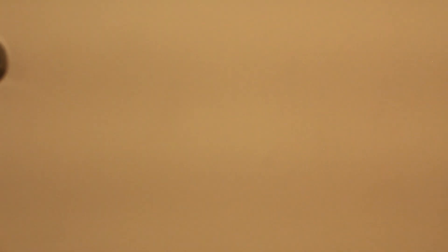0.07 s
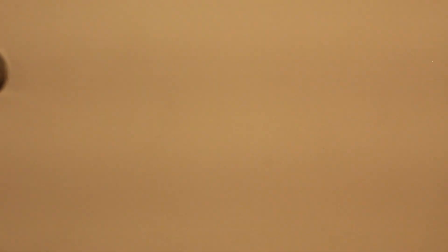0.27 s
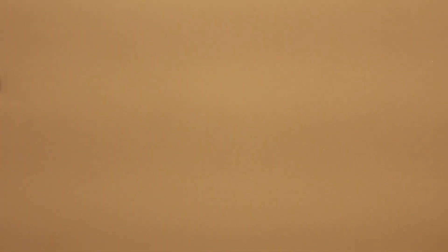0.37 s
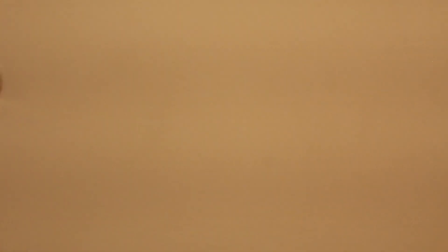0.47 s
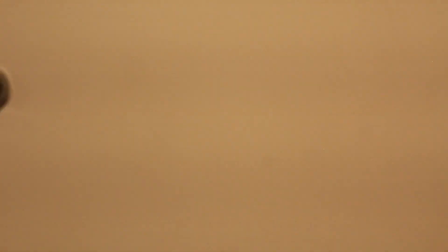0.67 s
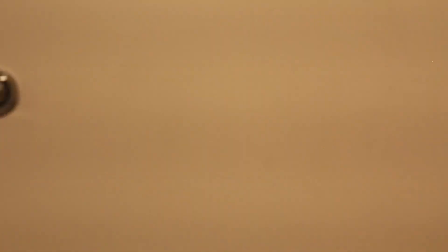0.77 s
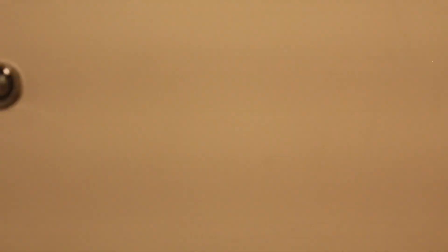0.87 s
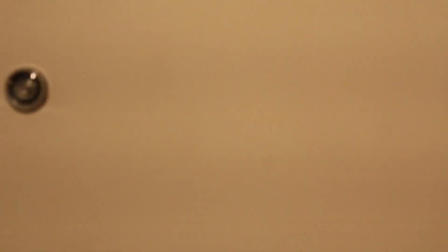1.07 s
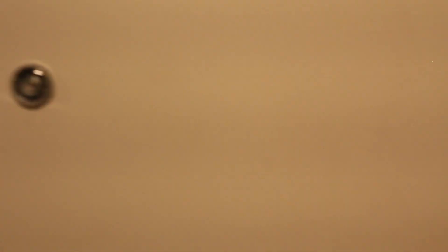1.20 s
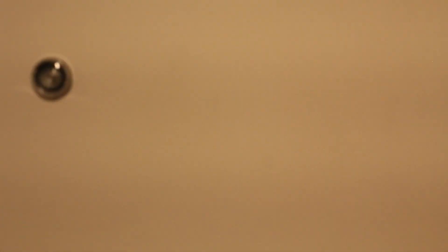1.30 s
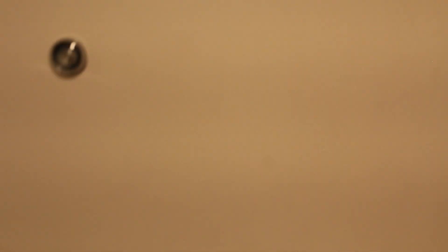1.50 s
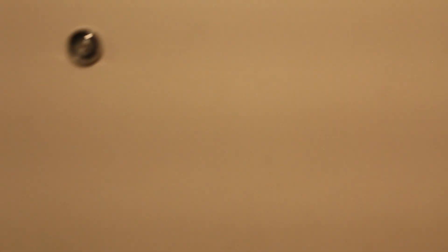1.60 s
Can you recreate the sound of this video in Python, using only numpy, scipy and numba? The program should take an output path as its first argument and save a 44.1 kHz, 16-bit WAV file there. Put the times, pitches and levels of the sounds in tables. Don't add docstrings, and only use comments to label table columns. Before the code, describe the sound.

Close microphone on a wooden door: six rapid, hollow hand knocks with a slight frame rattle, short indoor echo, tiny bright metallic tinkles of keys around them, then quiet room noise.

```python
import sys
import numpy as np
from scipy import signal
from scipy.fft import rfft, irfft
from scipy.io import wavfile
from numba import njit

SR = 44100
rng = np.random.default_rng(int(sys.argv[2]) if len(sys.argv) > 2 else 0)


def invert_db(level):
    return 10 ** (np.asarray(level, dtype=float) / 20)


def transcribe(signal):
    frames = np.atleast_2d(signal).T
    limited = np.clip(frames, -1, 1)
    pcm = np.round(limited * 32767).astype(np.int16)
    wavfile.write(sys.argv[1], SR, pcm)


N = 72765

# start [s], level [dB], contact time [ms], extra level of the low panel
# modes [dB], level of the frame slap over the blow [dB].
KNOCKS = [
    (0.2301, -7, 0.81, -1.5, 6),
    (0.4587, -6.5, 0.58, 1, 3),
    (0.6818, -5, 0.59, 0.5, 2.4),
    (0.9019, -6, 0.58, -0.5, 3.63),
    (1.1199, -5, 0.68, -13, 3.5),
    (1.3343, -2.5, 0.68, -17.5, 2.5),
]


def strikes(times, gains):
    x = np.zeros(N + 1)
    at = np.asarray(times) * SR
    i = at.astype(int)
    np.add.at(x, i, gains * (1 - at + i))
    np.add.at(x, i + 1, gains * (at - i))
    return x[:N]


def decay(t60):
    return np.exp(-np.log(1000) / (t60 * SR))


def ring(x, hz, t60):
    pole = decay(t60) * np.exp(2j * np.pi * hz / SR)
    return signal.lfilter([1], [1, -pole], x).imag


def body(times, db, modes, scatter_db):
    chance = rng.standard_normal((len(times), len(modes)))
    out = np.zeros(N)
    for k, (hz, mode_db, t60) in enumerate(modes):
        gains = invert_db(db + mode_db + scatter_db * chance[:, k])
        out += ring(strikes(times, gains), hz, t60)
    return out


def burst(times, db, hz, width_hz, t60):
    fade = signal.lfilter([1], [1, -decay(t60)], strikes(times, invert_db(db)))
    edges = np.clip([hz - width_hz / 2, hz + width_hz / 2], 100, SR * 0.45)
    band = signal.butter(2, edges, "band", fs=SR, output="sos")
    return signal.sosfilt(band, fade * rng.standard_normal(N))


def air():
    # frequency [Hz], level per Hz [dB].
    floor_curve = [(20, -13), (60, -8.5), (150, 0), (400, -8.5), (1500, -17.5), (5000, -30.5),
                   (13500, -29.5), (16000, -60.5)]
    level_db, duck_db, duck_hold_s = -49.5, -1.5, 1.5

    curve_hz, curve_db = np.array(floor_curve).T
    f = np.maximum(np.arange(N // 2 + 1) * SR / N, 1)
    tint = invert_db(np.interp(np.log(f), np.log(curve_hz), curve_db))
    hiss = irfft(rfft(rng.standard_normal(N)) * tint, N)

    blows = strikes(np.array(KNOCKS)[:, 0], 0.41)
    load = np.tanh(signal.lfilter([1], [1, -np.exp(-1 / (duck_hold_s * SR))], blows))
    return hiss * invert_db(level_db + duck_db * load) / hiss.std()


def keys():
    # start [s], first ring [dB], second ring [dB].
    hits_a = [(0.388, -31, -54), (0.3934, -48, -64), (0.4075, -41, -70), (0.6274, -59, -54),
              (0.6374, -38, -51), (0.7881, -71, -50), (0.832, -38, -49), (0.8415, -47, -37),
              (0.8564, -45, -43), (0.8629, -40, -53), (0.9173, -46, -59.5), (0.9996, -54, -48),
              (1.0444, -66, -66), (1.0635, -71, -50), (1.291, -47, -37), (1.291, -39, -44),
              (1.3464, -39, -68), (1.3608, -35, -57)]
    hits_b = [(0.0992, -45, -65), (0.2884, -59, -51), (0.4644, -63, -55), (0.5354, -76, -48),
              (0.5652, -50, -41.5), (0.9323, -40, -59), (0.9837, -67, -54), (1.0121, -51, -39),
              (1.1263, -69.5, -63), (1.2675, -67, -58), (1.4331, -67, -60), (1.4574, -74, -64),
              (1.475, -44, -60), (1.5738, -53, -90), (1.6342, -72, -69)]
    hits_c = [(0.2882, -49, -68), (0.3177, -57, -78), (0.3544, -59, -67), (0.4664, -54, -53),
              (0.4828, -62, -67), (0.7701, -64, -71), (0.9353, -63, -54), (1.012, -59, -55),
              (1.1803, -70, -86), (1.3917, -52, -77), (1.417, -74, -84)]
    ring_hz = [(12420, 13620, 8600), (6210, 7440, 11400), (8320, 13830, 11100)]
    # t60 of the three rings [s, s, s], third ring against the louder of the others [dB].
    ring_decay = [(.071, .071, .071, -9), (0.09, 0.077, 0.14, -7.5), (.21, .151, .061, -11)]
    # start [s], level [dB].
    click_hits = [(0.386, -31.5), (0.4509, -61.5), (0.4654, -60), (0.546, -44), (0.5544, -63),
                  (0.5721, -27.5), (0.7128, -45.5), (0.794, -46), (0.92, -31), (0.9314, -40), (1.0137, -42),
                  (1.0725, -60), (1.121, -36.5), (1.2326, -48), (1.2675, -56), (1.2873, -36), (1.3514, -59),
                  (1.3643, -48), (1.474, -66)]
    touch_ms, second_lift_db = 0.66, 5
    keys_db, clicks_db = -9, -6.4

    touch = signal.windows.hann(int(touch_ms * SR / 1000) + 3)
    jingle = np.zeros(N)
    for hits, pitches, (*t60s, third_db) in zip((hits_a, hits_b, hits_c), ring_hz, ring_decay):
        s, first, second = np.array(hits).T
        second = second + second_lift_db
        third = np.maximum(first, second) + third_db
        for hz, t60, db in zip(pitches, t60s, (first, second, third)):
            soft = touch * np.cos(2 * np.pi * hz / SR * np.arange(len(touch))) * 2 / touch.sum()
            jingle += ring(np.convolve(strikes(s, invert_db(db)), soft)[:N], hz, t60)

    s, db = np.array(click_hits).T
    clicks = burst(s, db, hz=10720, width_hz=7700, t60=0.022)
    return invert_db(keys_db) * jingle + invert_db(clicks_db) * clicks


def wood_grain():
    low_hz, top_hz, level_db, t60_s = 260.5, 3293, -21, 0.18
    pick = rng.random((50, 2))
    hz = low_hz * (top_hz / low_hz) ** pick[:, 0]
    t60 = t60_s * (0.5 + pick[:, 1]) * (700 / hz) ** 0.4
    return np.c_[hz, level_db + 0 * hz, t60]


def door():
    # frequency [Hz], level [dB], t60 [s].
    panel_low = [(385.6, -5.5, 0.086), (455.7, -22.5, 0.4), (505, -13.5, 0.32), (578, -6.5, 0.14)]
    panel = [(689, -6.5, 0.11), (798, -16.5, 0.23), (855, -1.5, 0.12), (1001.2, 3.5, 0.064),
             (1053, -13.5, 0.15), (1216.7, -0.5, 0.064), (1314.5, 8.5, .05), (1416, -7, 0.045),
             (1551, -6, 0.046), (1734, -4.5, 0.023), (1962, -1.5, 0.025), (2040, -40, 0.035)]
    leaf = [(70, -28, 0.58), (110.5, -18.5, 1.05), (139.8, -28, 0.6), (164, -44, 0.035), (181, -14.5, 0.47),
            (211.7, 0, 0.087), (278, -10, 0.034)]
    scatter_db, low_edge_hz, low_cut_hz = 1.5, 620, 79.5
    slap_ms, tick_ms, echo_ms = 2.7114, 0.39, 44.5
    tick_db, echo_db = -44, -38.5

    out = np.zeros(N)
    grain = wood_grain()
    is_low = grain[:, 0] < low_edge_hz
    plus = np.arange(len(grain)) % 2 == 1
    for s, db, contact_ms, low_db, slap_db in KNOCKS:
        when = np.array([s, s + slap_ms / 1000])
        size = np.array([db, db + slap_db])
        rung = body(when, size, panel, scatter_db)
        rung += body(when, size + low_db, panel_low, scatter_db)
        rung += body(when, size, leaf, scatter_db)
        here = grain + np.outer(is_low, [0, low_db, 0])
        rung += body(when, size, here[plus], 3.53)
        rung -= body(when, size, here[~plus], 4.3)

        u = np.arange(128) / SR * 1000 / contact_ms
        push = np.where(u < 1, np.sin(np.pi * u) ** 2, 0)
        out -= invert_db(-8) * np.convolve(rung, push / push.sum())[:N]

        slap = when[1:]
        out += burst(slap + tick_ms / 1000, size[1:] + tick_db, hz=3600, width_hz=5000, t60=0.039)
        answer = slap + echo_ms / 1000 + np.array([-0.002, 0.002])
        out += burst(answer, db + echo_db, hz=3670, width_hz=3900, t60=0.021)
    return signal.sosfilt(signal.butter(4, low_cut_hz, "high", fs=SR, output="sos"), out)


@njit
def walls(x, lags, gain, damp):
    line, soft, out = np.zeros((8, 4096)), np.zeros(8), np.zeros(len(x))
    for i in range(len(x)):
        total = 0.
        for k in range(8):
            soft[k] += (1 - damp) * (gain[k] * line[k, (i - lags[k]) & 4095] - soft[k])
            total += soft[k]
            out[i] += soft[k] * (1 - 2 * (k % 2))
        for k in range(8):
            line[k, i & 4095] = x[i] + soft[k] - total / 4
    return out


def hall(knock):
    level_db, t60_s, damp = -31, 0.81, 0.27
    lags = np.array([709, 977, 1213, 1493, 1801, 2111, 2447, 2803])
    gain = invert_db(-60 * lags / SR / t60_s)
    return invert_db(level_db) * walls(knock + 1e-18, lags, gain, damp)


def scene():
    knock = door()
    return (knock + hall(knock) + keys() + air())[None]


def top_cut(x):
    return signal.sosfilt(signal.butter(12, 16460, fs=SR, output="sos"), x)


def record(dry):
    knee = 0.9
    room = 1 - knee
    over = np.maximum(np.abs(dry) - knee, 0)
    mix = np.clip(dry, -knee, knee) + np.sign(dry) * room * np.tanh(over / room)
    return top_cut(mix)


dry = scene()
out = record(dry)
transcribe(out)
```